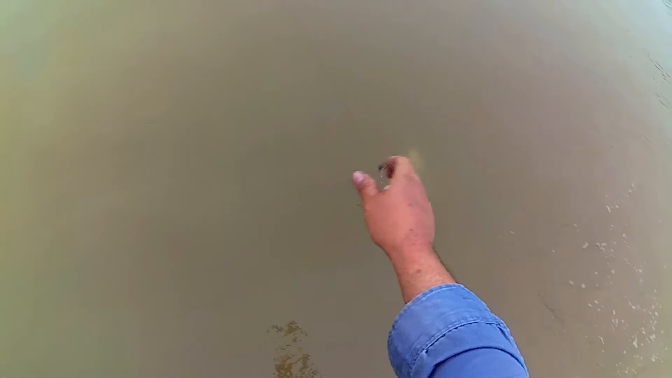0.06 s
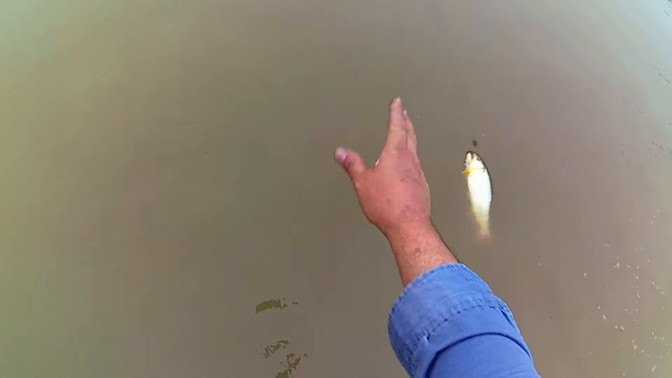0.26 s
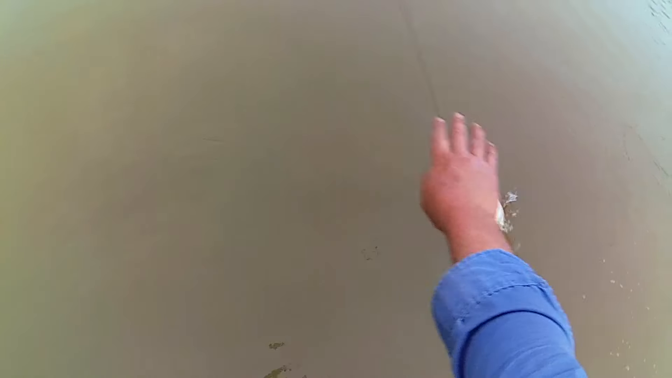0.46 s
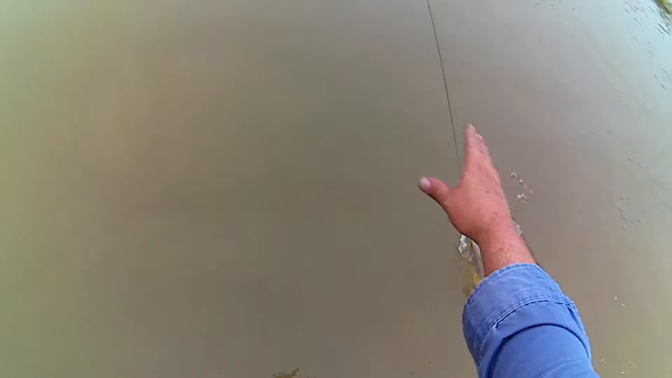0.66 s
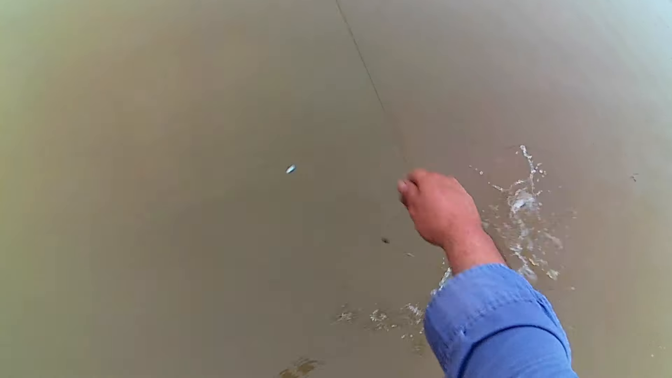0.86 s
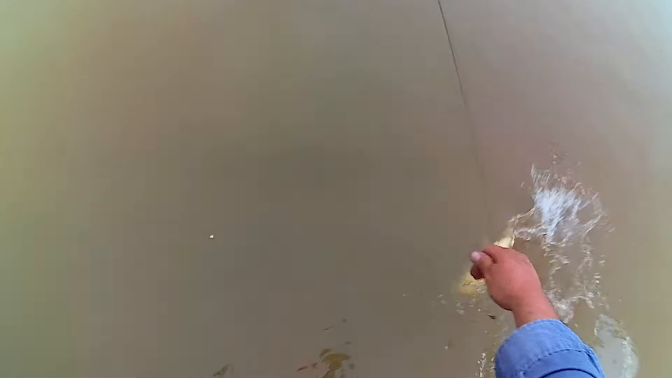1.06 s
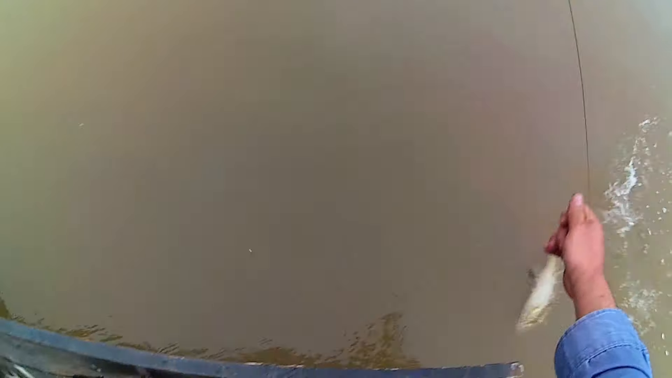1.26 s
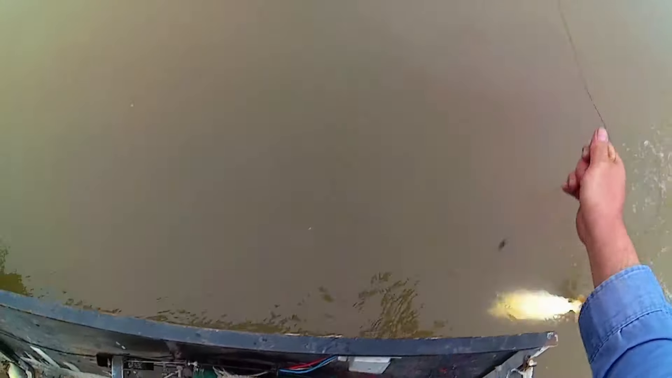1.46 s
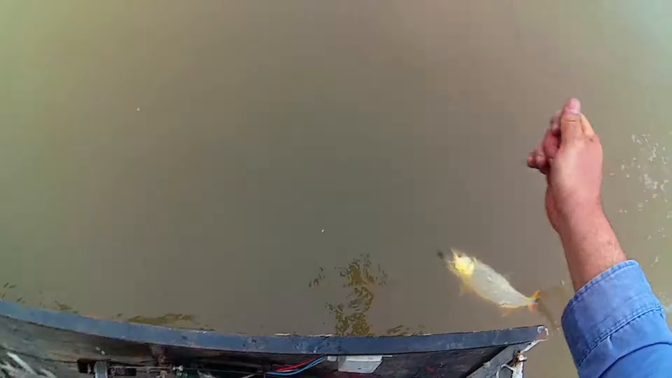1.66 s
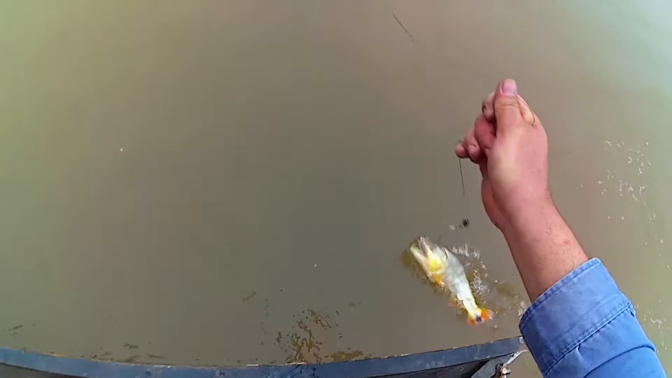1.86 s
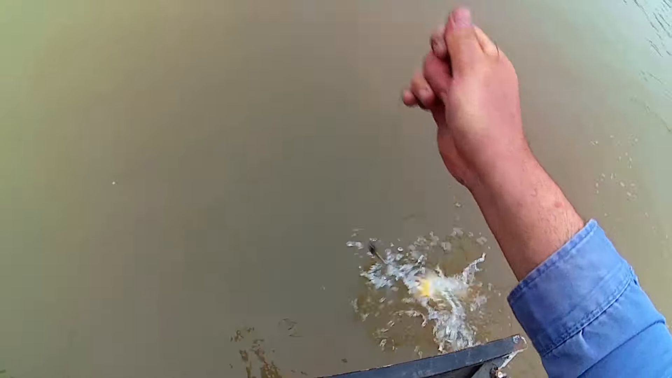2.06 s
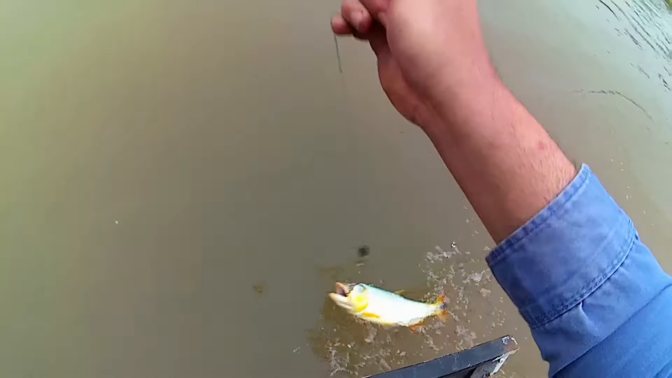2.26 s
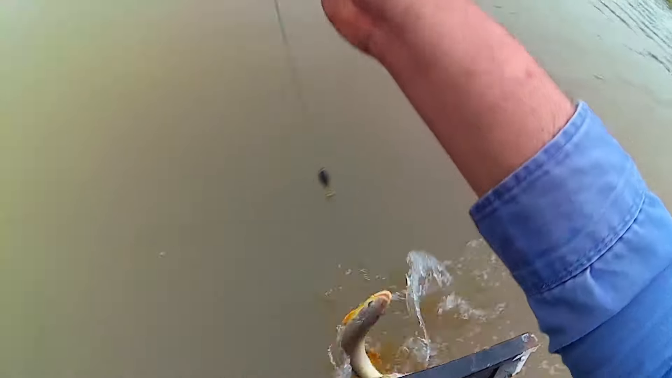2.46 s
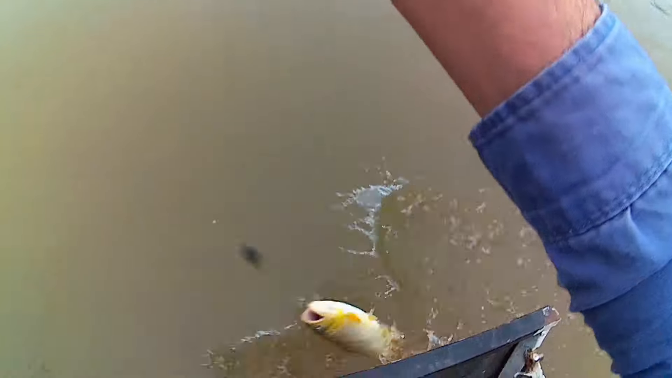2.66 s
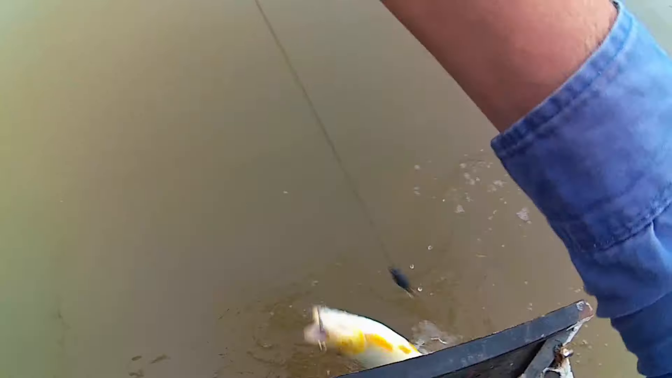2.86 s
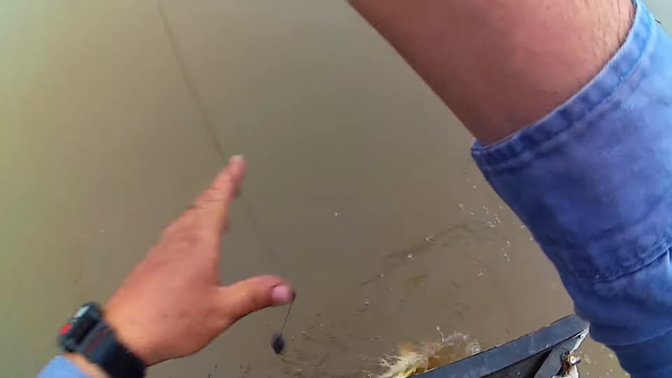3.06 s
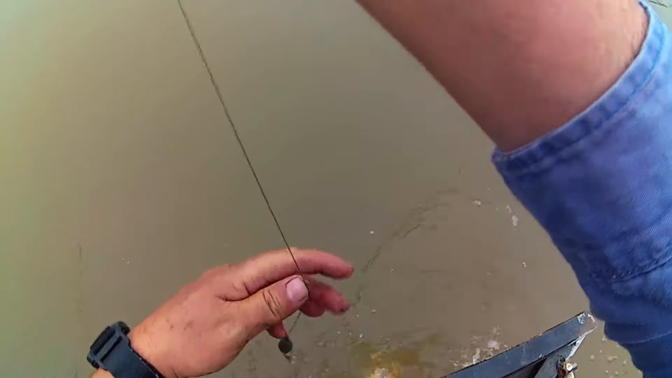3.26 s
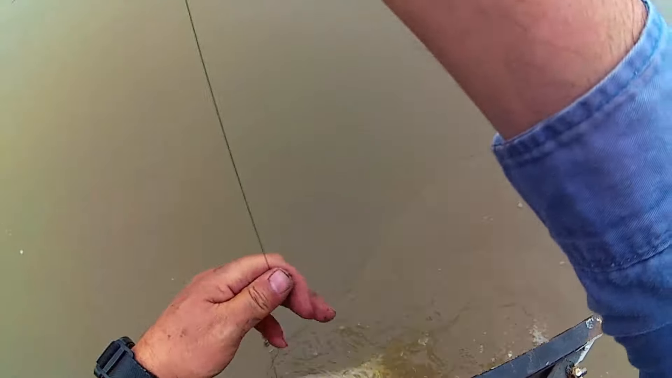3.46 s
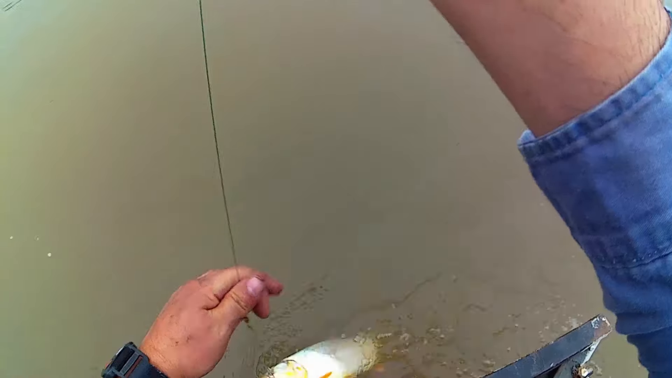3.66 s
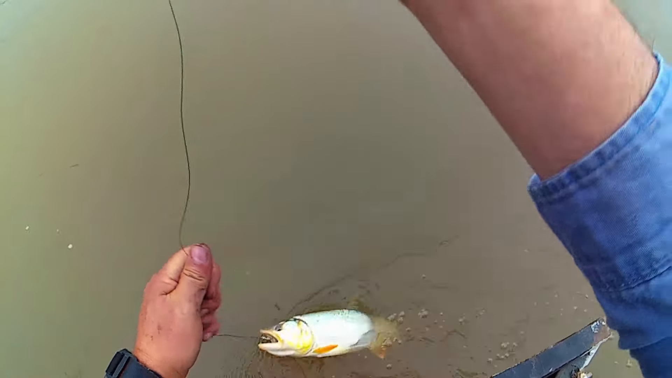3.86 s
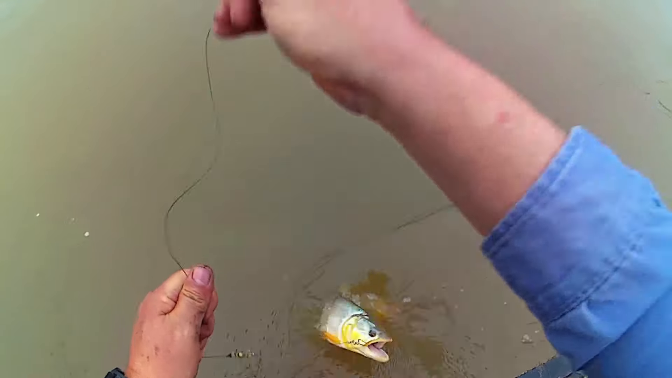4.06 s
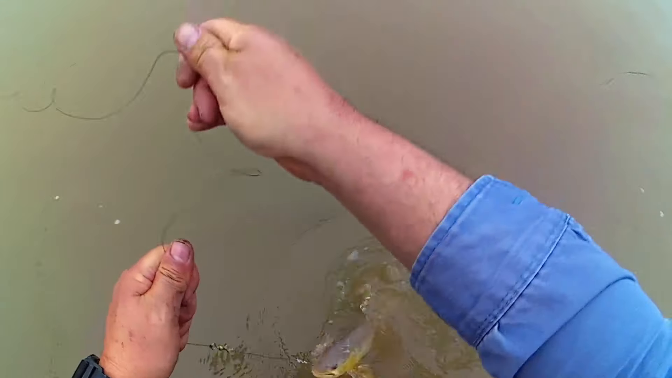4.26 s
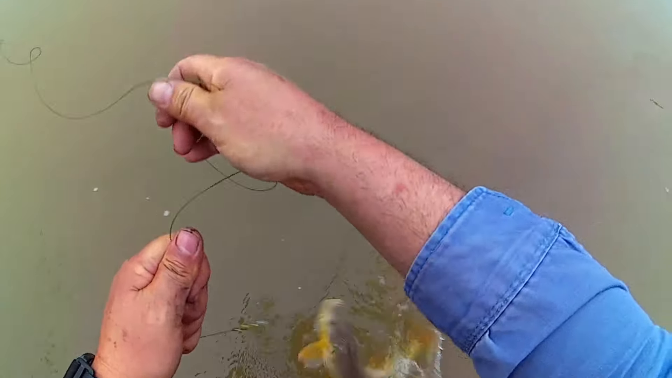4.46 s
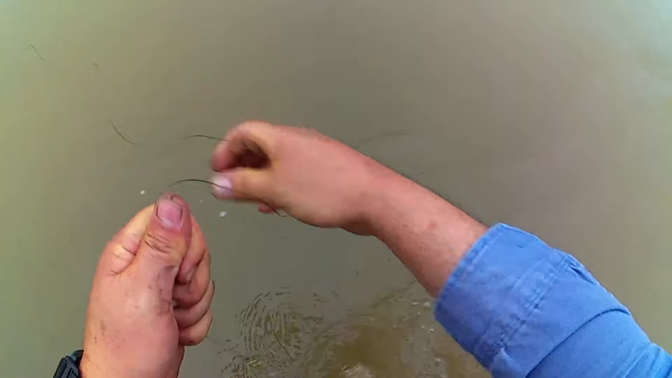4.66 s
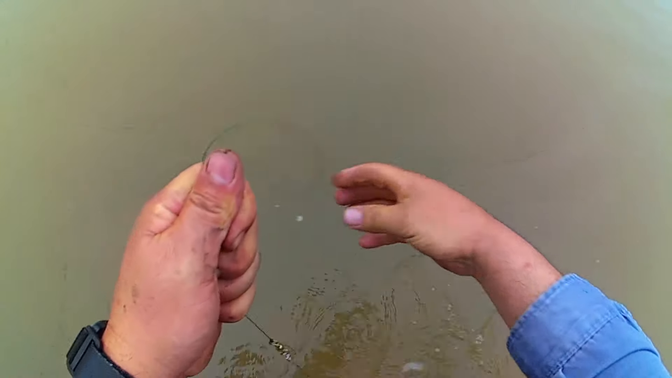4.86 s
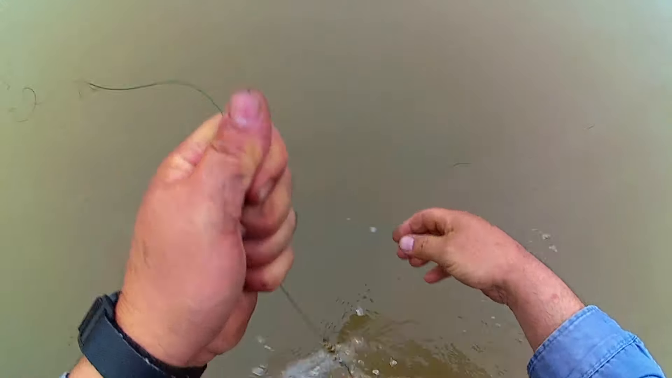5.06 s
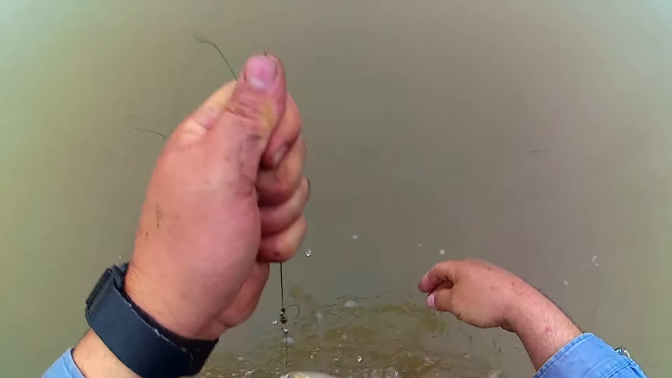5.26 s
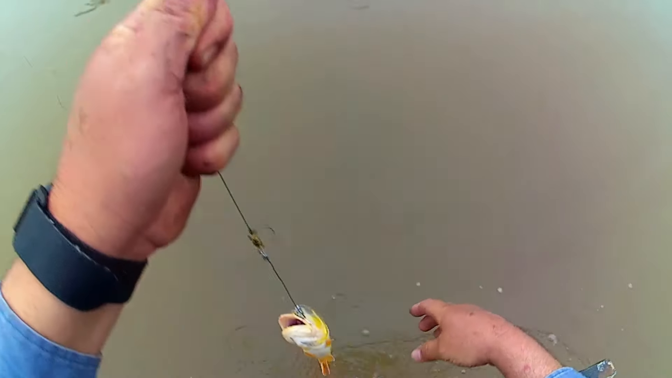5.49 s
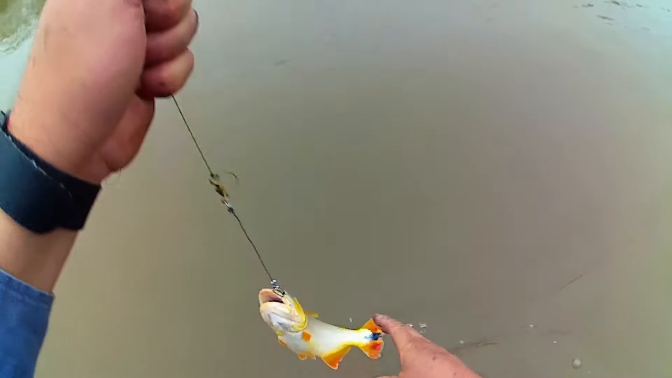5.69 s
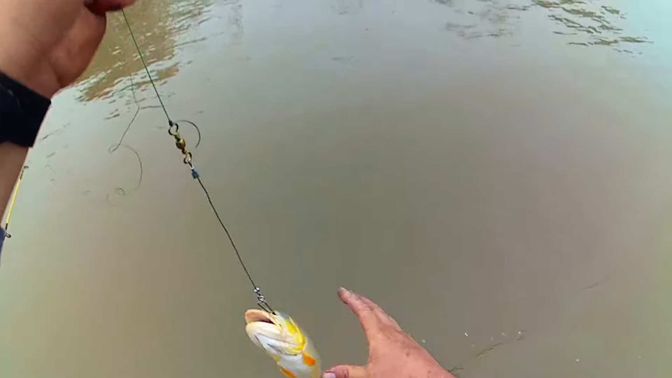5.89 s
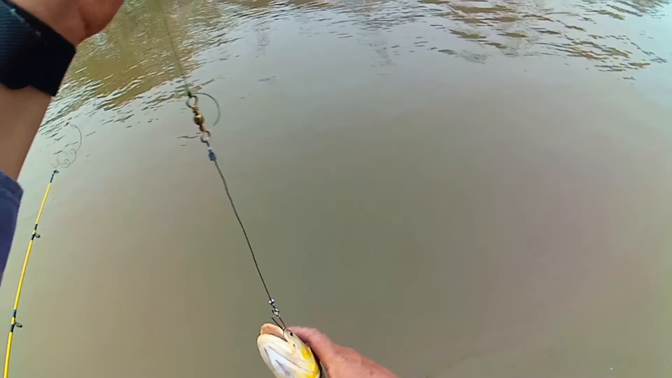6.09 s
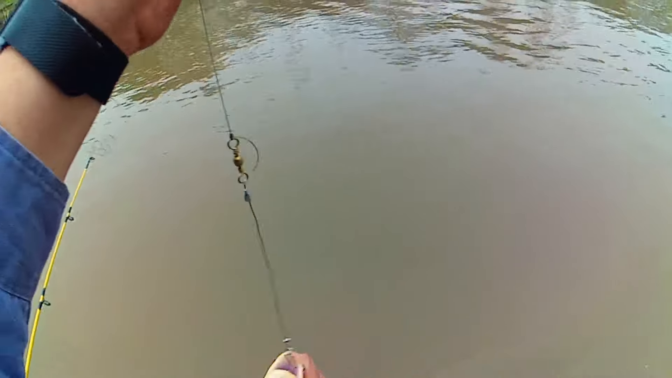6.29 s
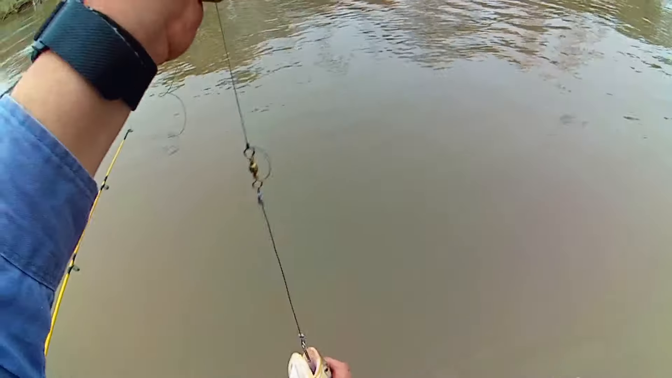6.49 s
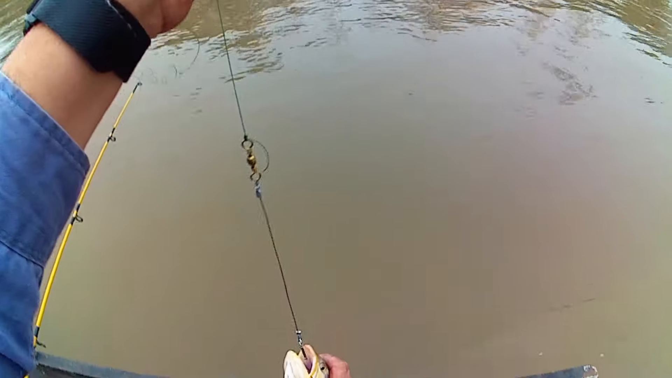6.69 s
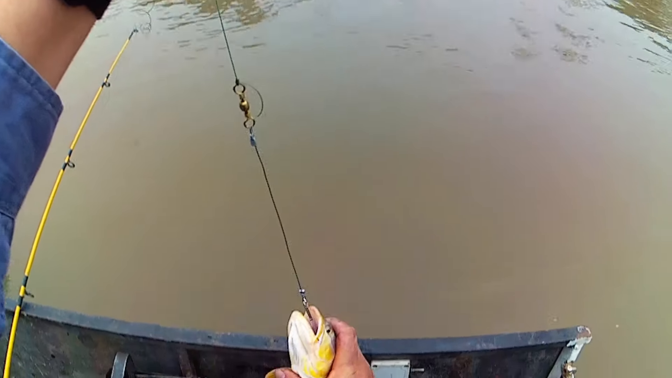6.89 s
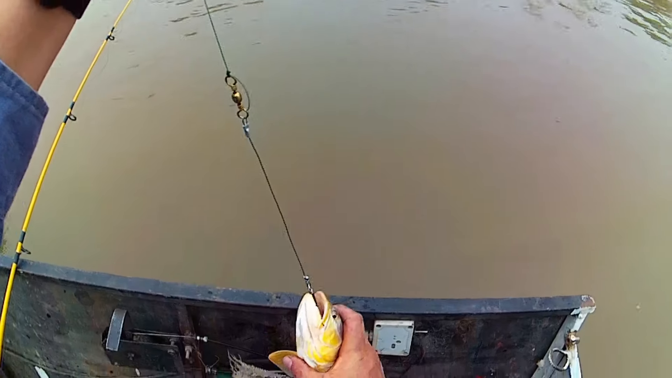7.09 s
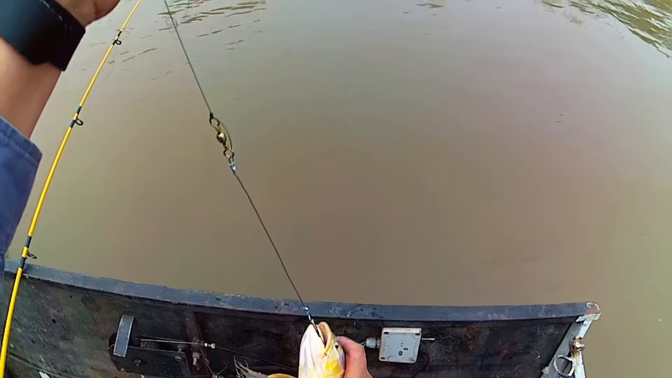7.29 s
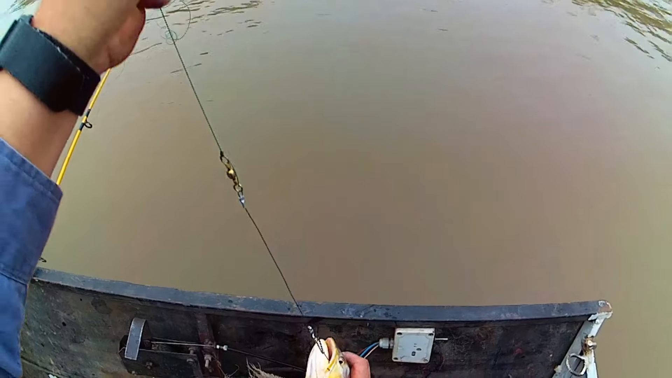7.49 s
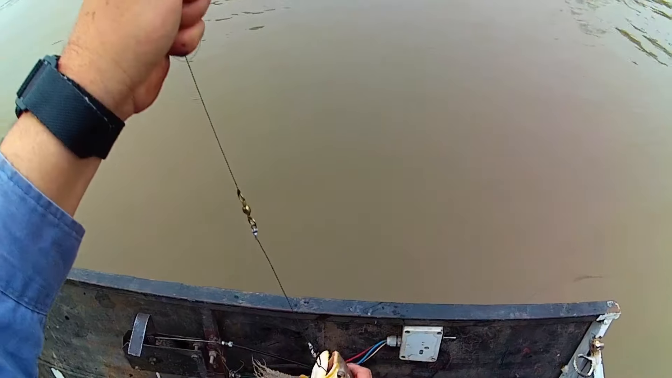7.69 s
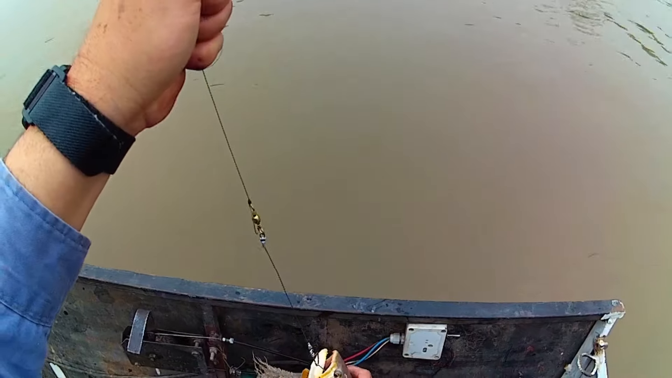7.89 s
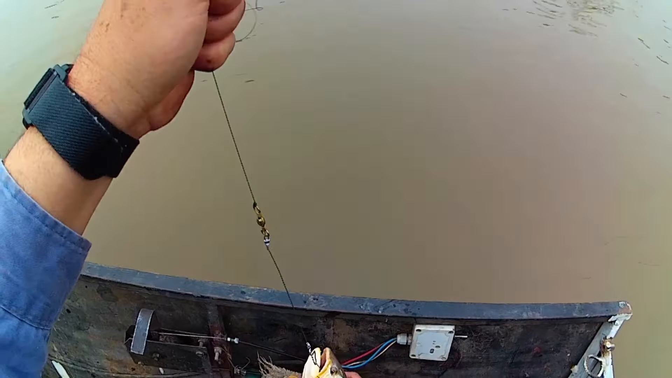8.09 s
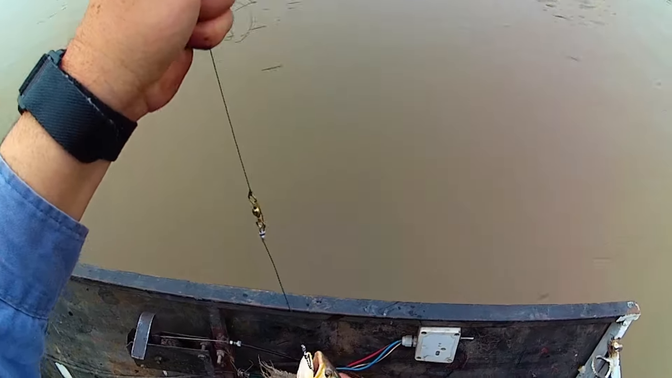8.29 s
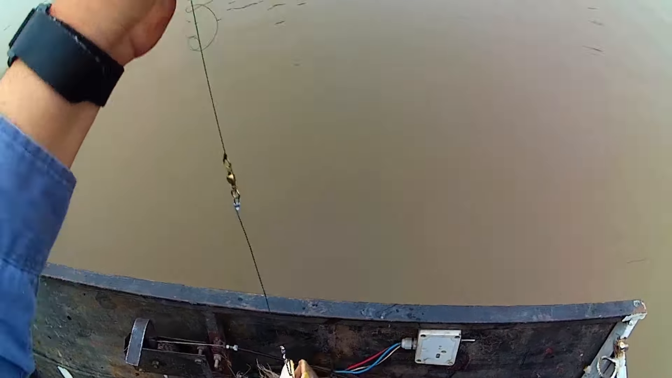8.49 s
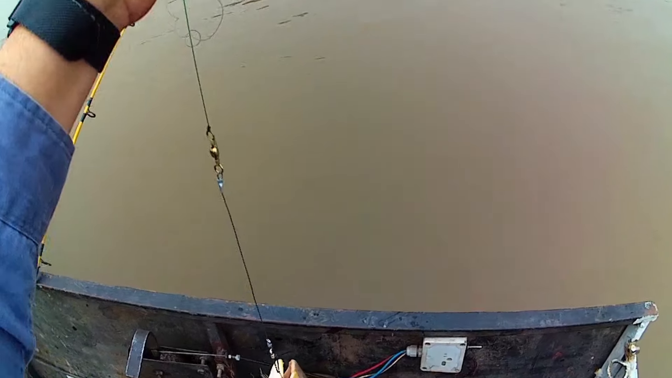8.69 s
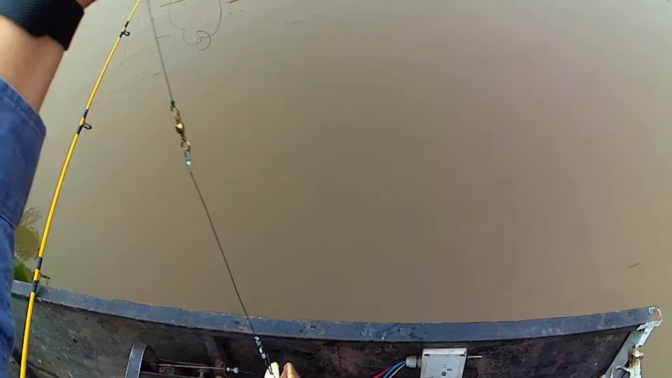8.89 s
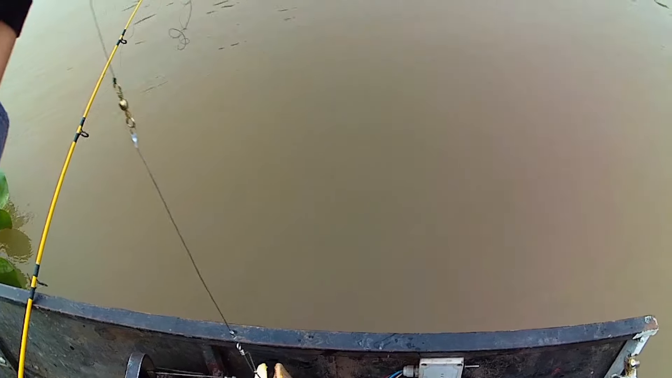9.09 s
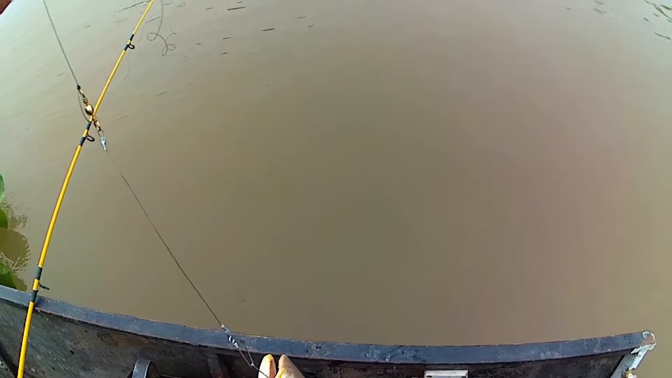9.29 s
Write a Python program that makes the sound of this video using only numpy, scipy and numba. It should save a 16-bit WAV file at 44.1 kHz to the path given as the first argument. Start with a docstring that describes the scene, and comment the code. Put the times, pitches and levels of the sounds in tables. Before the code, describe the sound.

Outdoors beside a small metal boat, with faint river wash, thin hiss and low wind buffets on a worn microphone. Splashes start sparse, grow into wet slaps and gurgling churn, and peak in two loud, booming hull blows with bright spray. Softer splashing returns, surges briefly near five seconds and dies away. As the fish is lifted out, soft thuds, low jolts and one bright metallic click close the scene quietly.

```python
"""River, light breeze and thin hiss at a body-worn camera beside a small metal boat: filtered noise throughout.
From the start a hooked fish thrashes: swarms of bubble sines over noise, single plops, noise-struck smacks.
Near 3 s it bangs the hull twice (boom, ringing modes, slap); the second bang throws a hissing sheet of water.
Weaker thrashing follows until about 6 s, with the first knock and jolt of the camera.
Then the fish is lifted out: knocks of dull noise, a few clacks of ringing tackle and further jolts remain."""
import sys
import numpy as np
from scipy import signal
from scipy.fft import rfft, irfft
from scipy.io import wavfile
from scipy.ndimage import uniform_filter1d
from numba import njit

SR = 44100
rng = np.random.default_rng(int(sys.argv[2]) if len(sys.argv) > 2 else 0)


def unload_audio(sound):
    """Save the sound as a 16-bit wav file, at the path given as the first command line argument."""
    columns = np.transpose(np.atleast_2d(sound))
    # keep every value between -1 and 1, then stretch to whole-number steps
    steps = np.round(np.clip(columns, -1, 1) * 32767)
    wavfile.write(sys.argv[1], SR, steps.astype(np.int16))


N = 411894

# breeze on the microphone, before buffets: (time [s], level in the lulls [dB])
GUSTS = [(0.0, -56.5), (0.52, -61.5), (0.83, -52), (2.03, -57.5), (2.18, -46.5), (3.0, -47.5), (3.6, -60),
         (4.81, -58.5), (4.94, -55.5), (5.96, -58.5), (6.11, -54), (6.45, -51.5), (6.97, -61.5),
         (8.48, -70), (8.66, -65), (9.34, -68)]
# wash of river and clothing: (time [s], level [dB])
WASH_LEVEL = [(0, -57.5), (.45, -67), (3.6, -57), (4.05, -70.5), (5.8, -68), (6.05, -60), (6.5, -59),
              (7.9, -70.5), (8.55, -68.5), (8.8, -63), (9.34, -61)]
# thin treble hiss: (time [s], level [dB])
HISS_LEVEL = [(0, -70.5), (.45, -74.5), (3.7, -70.5), (4.07, -74.5), (5.4, -69.5), (5.8, -74.5),
              (6.45, -71), (7.95, -78), (9.34, -77)]
# jolts of the worn camera: (time [s], envelope peak [dB], frequency [Hz])
JOLTS = [(3.954, -42, 62), (5.615, -31.5, 51), (6.129, -30.5, 36.3), (6.31, -32.5, 27), (6.837, -33, 76.5)]
# clacks of tackle: (time [s], peak [dB], brightness [dB/octave], low-pass [Hz])
CLACKS = [(6.4592, -23, 2, 7000), (6.485, -44, -3, 6000), (7.636, -41.5, -3, 3200), (8.41, -50, -1, 1600)]
# modes of the tackle: (frequency [Hz], relative level [dB], t60 [s])
TACKLE_MODES = [(417, 9, 0.12), (890, 4.5, 0.028), (1400, 17, 0.0086), (1845, 1.5, 0.015), (2510, 9, .01),
                (5000, -13, 0.0085)]
# bumps as the fish is handled: (time [s], level [dB], treble relative to thud [dB], t60 [s])
KNOCKS = [(3.742, -38.5, -41, 0.058), (5.872, -51, -17.5, 0.42), (5.988, -48.5, -32, 0.11),
          (6.064, -34, -37, 0.034), (6.345, -43.5, -19.5, 0.35), (6.452, -32, -35, 0.28),
          (6.643, -35.5, -41, 0.028), (6.746, -47, -18, 0.058), (6.825, -42, -21.5, 0.16),
          (7.064, -38.5, -41, 0.066), (7.084, -42.5, -25, 0.084), (7.117, -41, -29, 0.052),
          (7.161, -43, -38, 0.092), (7.221, -44.5, -23, 0.21), (7.289, -38.5, -28, 0.064),
          (7.559, -55.5, -22.5, 0.12), (7.637, -47.5, -23, 0.14), (7.764, -59.5, -23, 0.32),
          (7.804, -53.5, -14, 0.13), (8.41, -57.5, -23, 0.15)]
# fish against hull: (time [s], level [dB], boom frequency [Hz])
BANGS = [(3.042, -10, 460), (3.2143, -10.5, 285), (3.216, -9, 473)]
# modes of the hull: (frequency [Hz], relative level [dB], t60 [s])
HULL_MODES = [(120.1, -3, 0.85), (175.5, -8, 0.8), (237, -2, 0.72), (272.5, 2, 0.57), (299, 4.5, 0.58),
              (331, 3.5, .35), (358, -3.5, 0.28), (396, -5.5, 0.4), (450, 7, 0.3), (593, -6, 0.35),
              (823, -7.5, .3), (836, -4.5, 0.22), (1140, -11.5, 0.26), (1260, -13.5, 0.57)]
# smacks of tail and falling water: (time [s], peak [dB], centre [Hz], half the t60 of the push [s])
SMACKS = [(.957, -26, 1250, 0.013), (1.019, -28, 3500, 0.011), (1.0993, -11, 1200, 0.0031),
          (1.333, -18, 1300, 0.017), (2.025, -27, 1090, .008), (2.691, -24.5, 3300, 0.021),
          (2.752, -25.5, 2600, 0.0065), (2.807, -22.5, 1590, 0.003), (3.315, -26, 2660, .012),
          (3.349, -25.5, 1690, 0.0081), (3.582, -38, 3170, 0.011), (4.413, -38.5, 3840, 0.051),
          (4.453, -38, 1710, 0.0022), (4.744, -34, 1900, 0.0095), (4.877, -22, 1140, 0.072),
          (5.132, -30, 1410, 0.0069), (5.269, -33, 3150, 0.012), (5.624, -43, 3600, 0.017)]
# closing air pockets and single drops:
# (time [s], starting pitch [Hz], level before damping [dB], life [s], pitch rise before limiting [octaves])
PLOPS = [(.545, 570, -40.5, 0.041, 2.5), (0.737, 905, -26, 0.016, -0.5), (0.751, 747, -21.5, 0.017, 0),
         (0.9559, 947, -15, 0.018, .1), (1.176, 291, -26, 0.035, 1.7), (1.262, 2300, -36, 0.0096, -4),
         (1.275, 312, -34, 0.077, 0.8), (1.302, 1025, -24, 0.011, .5), (1.325, 524, -10, 0.019, 0.6),
         (1.332, 785, -20, 0.022, .2), (1.912, 735, -37, 0.025, -0.3), (1.962, 844, -23, 0.025, 0.5),
         (1.967, 335, -27, 0.093, -0.5), (2.024, 780, -23, 0.02, .7), (2.144, 995, -20.5, 0.026, 1.2),
         (2.182, 3640, -32.5, 0.007, 1), (2.188, 408, -23.5, 0.022, 1), (2.407, 2050, -39, 0.011, .6),
         (2.422, 2290, -32.5, 0.0091, 2.3), (2.519, 754, -24, 0.058, 0.3), (2.655, 783, -18, 0.061, -0.3),
         (2.752, 1050, -16, 0.0049, 1.2), (2.7679, 647, -15, 0.0095, 2.5), (3.347, 1140, -22.5, 0.012, .7),
         (3.394, 3280, -28.5, 0.017, 1.1), (3.573, 4640, -38.5, 0.0048, 1.7),
         (3.609, 567, -33.5, 0.054, -0.1), (3.649, 960, -29.5, 0.023, 0.4), (4.1756, 977, -31, 0.028, .6),
         (4.198, 630, -33.5, 0.012, 0), (4.292, 305, -30, 0.0072, -1.2), (4.452, 313, -24, 0.01, 0),
         (4.478, 496, -31, 0.041, 0.5), (4.501, 674, -24.5, 0.0046, 1), (4.658, 1055, -38, 0.0264, 2),
         (4.774, 242, -17.5, 0.005, 1), (4.809, 906, -25.5, 0.024, 2), (4.824, 475, -21, 0.016, 0),
         (4.844, 810, -19, 0.013, .2), (4.861, 469, -14, 0.027, 0.5), (4.92, 3650, -36, .01, 2.5),
         (4.989, 262, -32, .112, 2.3), (5.122, 970, -30.5, 0.024, 0.4), (5.266, 657, -26.5, 0.017, -0.5),
         (5.296, 532, -33.5, 0.054, 0.1), (5.401, 1120, -34, 0.021, 1)]
# strokes through the surface: (time [s], length [s], bubbling [dB], deep churning [dB], spray [dB])
STROKES = [(.01, 0.022, -61, -89, -65), (0.535, 0.051, -50, -59, -65), (0.579, 0.095, -42, -54.5, -56),
           (0.718, 0.23, -40.5, -63, -53.5), (0.906, 0.093, -38, -64, -49.5),
           (1.087, 0.068, -38, -61, -48.5), (1.166, 0.11, -38.5, -51, -47.5), (1.308, 0.039, -32, -67, -42),
           (1.467, 0.056, -42, -52, -52), (1.636, 0.0083, -49, -55.5, -83), (1.722, 0.019, -49, -47, -64),
           (1.796, 0.17, -59.5, -65.5, -73.5), (1.952, 0.11, -39, -36.5, -48.5),
           (2.063, 0.048, -35.5, -46, -43), (2.141, 0.074, -36, -41, -52.5),
           (2.25, 0.13, -39.5, -55, -47.5), (2.365, 0.35, -42, -37.5, -54.5),
           (2.634, 0.18, -38.5, -42, -44.5), (2.895, 0.022, -35.5, -41, -45), (3.051, 0.054, -41, -32, -57),
           (3.236, 0.11, -41, -39.5, -48), (3.565, 0.076, -49.5, -55, -63),
           (4.155, 0.045, -50.5, -67.5, -56.5), (4.3, 0.097, -53.5, -52, -65.5),
           (4.407, 0.091, -46, -50.5, -61), (4.646, 0.061, -61, -79, -57.5),
           (4.735, 0.15, -42, -46.5, -53.5), (4.833, 0.041, -32.5, -34.5, -42),
           (4.92, 0.012, -62, -39, -57), (5.03, 0.19, -49, -62.5, -59), (5.237, 0.12, -44.5, -58, -51.5),
           (5.388, 0.12, -59, -56.5, -64), (5.566, 0.11, -72, -65.5, -72)]
# rows bubbling, churning, spray: (attack [s], release t60 [s], settling share [dB], settling t60 [s])
STROKE_RESPONSE = [(0.009, 0.22, -11.5, 0.96), (0.023, 0.27, -15.5, 1.0), (0.024, 0.33, -10.5, 1)]

# spectra: (frequency [Hz], relative density [dB per Hz])
BREEZE_SPECTRUM = [(12, 3.5), (30, -6.5), (70, -1.5), (110, -7.5), (180, -25), (400, -48), (900, -55.5)]
RIVER_SPECTRUM = [(100, -5.5), (250, -2), (450, -4.5), (800, -10), (1400, -12), (2000, -22), (4800, -28),
                  (7000, -31.5), (12000, -42.5)]
HISS_SPECTRUM = [(1300, -15.5), (2000, -10), (2700, -4.5), (5000, -9), (7900, -5.5), (8400, 3),
                 (9000, -5.5), (12300, -4.5), (13600, -2), (15500, -3.5)]
KNOCK_SPECTRUM = [(60, -13), (190, 7), (420, 1.5), (700, -2.5), (1300, -14), (2400, -33), (12000, -55.5)]
SHEET_SPECTRUM = [(500, -11.5), (1200, 12), (2700, -1.5), (3200, -6.5), (3900, 2.5), (6200, -6.5),
                  (8000, -1.5), (10500, -3), (15000, -16)]
CHURNING_SPECTRUM = [(70, -31), (130, -1.5), (250, -3.5), (420, -4), (560, 1), (900, -24.5), (4000, -72)]
BUBBLING_SPECTRUM = [(230, -33), (420, -5), (600, 0), (850, 2.5), (1250, -3), (1650, -9.5), (2400, -36),
                     (6000, -42.5)]
SPRAY_SPECTRUM = [(1000, -28.5), (1700, -12), (2220, -10), (2700, -5.5), (3220, -19), (3800, -7),
                  (4370, -15), (5500, -14.5), (6320, -21), (7960, -15.5), (9580, -14.5), (10800, -25.5),
                  (12300, -29), (14100, -26), (15500, -32)]

BUFFET_DB, BUFFET_SPREAD_DB, BUFFETS_PER_S = 7.5, 3, 11  # mean height above the lulls, spread, rate
DRUMMING_DB, DRUMMING_T60_S, DRUMMING_TOP_HZ = -22, 0.68, 483  # small hull panels rumbling on
SHEET_START_S, SHEET_ATTACK_S, SHEET_HOLD_S, SHEET_T60_S, SHEET_DB = 3.199, 0.0032, 0.024, 0.079, -27.5
DRAIN_DB, DRAIN_T60_S = -24.5, 0.53  # level relative to the sheet
DAMPING_HZ = 399  # a pocket of this pitch loses one neper over its life, higher ones more
CLIMB_HZ = 700  # limit on a pocket's pitch rise: it bursts first
RUSH_DB, MIST_DB = -9, -3  # torn water relative to the bubbles, fine mist relative to the drops
IN_WATER_S = 6.0
TOP_HZ = 15750


def undb(db):
    """Decibels to gain."""
    return 10 ** (np.asarray(db) / 20)


def unit(x):
    """Scale to rms 1."""
    return x / np.sqrt(np.mean(x ** 2))


def curve(table):
    """Rows of (time [s], value) joined by straight lines."""
    return np.interp(np.arange(N) / SR, *np.transpose(table))


def add(out, start_s, x):
    """Mix x into out at start_s."""
    i = max(int(start_s * SR), 0)
    out[i:i + len(x)] += x[:max(N - i, 0)]


def colour(x, points, size=4096):
    """Minimum-phase filter with the given (Hz, dB) response, built from its folded cepstrum."""
    hz, db = np.transpose(points)
    f = np.maximum(np.fft.rfftfreq(size, 1 / SR), 1)
    response_db = np.interp(np.log(f), np.log(hz), db)
    cepstrum = irfft(np.log(undb(response_db)))
    cepstrum[1:size // 2] *= 2
    cepstrum[size // 2 + 1:] = 0
    impulse = irfft(np.exp(rfft(cepstrum)))
    return signal.fftconvolve(x, impulse)[:len(x)]


def noise(points, count=N):
    """Noise of rms 1 with the given (Hz, dB) spectrum."""
    return unit(colour(rng.standard_normal(count), points))


def walk(rate_hz):
    """Smoothed random steps, rate_hz per second, rms near 1."""
    k = int(SR / rate_hz)
    steps = np.repeat(rng.standard_normal(N // k + 1), k)
    return unit(uniform_filter1d(steps, k)[:N])


def fade(t, t60_s):
    """Decay that falls 60 dB in t60_s."""
    return np.exp(-np.log(1000) * t / t60_s)


def band(x, hz, width):
    """One resonance, its width a share of its centre."""
    return signal.lfilter(*signal.iirpeak(hz, 1 / width, fs=SR), x)


def lowpass(x, top_hz, order=4):
    """Butterworth low-pass."""
    return signal.sosfilt(signal.butter(order, top_hz, fs=SR, output="sos"), x)


def modes(t, hz, gain_db, t60_s, phase=0):
    """One decaying resonant mode."""
    return undb(gain_db) * fade(t, t60_s) * np.sin(2 * np.pi * hz * t + phase)


def breeze():
    """Wind pressure on the microphone: low noise in random buffets."""
    buffets_db = BUFFET_DB + BUFFET_SPREAD_DB * walk(BUFFETS_PER_S)
    return noise(BREEZE_SPECTRUM) * undb(curve(GUSTS) + buffets_db)


def wash_and_hiss():
    """River and clothing wash plus thin hiss: noises whose levels ripple together."""
    ripple_db = 1.8 * walk(22)
    wash = noise(RIVER_SPECTRUM) * undb(curve(WASH_LEVEL) + ripple_db)
    hiss = noise(HISS_SPECTRUM) * undb(curve(HISS_LEVEL) + ripple_db / 2)
    return wash + hiss


def jolts():
    """Body movement jolts the camera: a slow, quickly dying swing of pressure at the microphone."""
    out, t = np.zeros(N), np.arange(SR // 4) / SR
    for start_s, db, hz in JOLTS:
        cycles = hz * t
        envelope = 2 * cycles * np.exp(1 - 2 * cycles)
        add(out, start_s, undb(db) * np.sin(2 * np.pi * cycles) * envelope)
    return out


def clacks():
    """A hard, slightly rattling contact excites the tackle's modes; each clack has its own brightness."""
    out, t = np.zeros(N), np.arange(SR // 5) / SR
    lowest_hz = TACKLE_MODES[0][0]
    for start_s, db, tilt, top_hz in CLACKS:
        ring = sum(modes(t, hz, gain + tilt * np.log2(hz / lowest_hz), t60_s)
                   for hz, gain, t60_s in TACKLE_MODES)
        contact = .2 * rng.standard_normal(len(t)) * fade(t, 0.0057)
        contact[0] += 1
        x = lowpass(signal.fftconvolve(contact, ring)[:len(t)], min(top_hz, SR / 3))
        add(out, start_s, undb(db) * x / np.abs(x).max())
    return out


def hull(t):
    """The hull's modes; every blow lands elsewhere and weights them anew."""
    chance = rng.standard_normal((len(HULL_MODES), 2))
    ring = sum(modes(t, hz, db + shift_db, t60_s, phase / 2)
               for (hz, db, t60_s), (shift_db, phase) in zip(HULL_MODES, chance))
    return ring * (1 - fade(t, 0.04)) / np.sqrt(len(HULL_MODES))


def knocks():
    """Bumps in the boat: a dull noise thud with a little scuff, carried faintly by the hull."""
    out, t = np.zeros(N), np.arange(SR // 2) / SR
    for start_s, db, treble_db, t60_s in KNOCKS:
        thud = noise(KNOCK_SPECTRUM, len(t))
        scuff = undb(treble_db) * noise(SPRAY_SPECTRUM, len(t))
        bump = (thud + scuff) * fade(t, t60_s) + undb(-21.0) * hull(t)
        add(out, start_s, undb(db) * (1 - fade(t, 0.0055)) * bump)
    return out


def bangs():
    """The soft body strikes with a short boom and a wet slap; the hull rings and rumbles on."""
    out, t = np.zeros(N), np.arange(SR) / SR
    yielding = 1 - fade(t, 0.005)  # flesh gives way, so the noise takes a moment to build
    for start_s, db, hz in BANGS:
        boom = np.sin(2 * np.pi * hz * t) * fade(t, 0.032) * (1 - fade(t, 0.013))
        rattle = noise(KNOCK_SPECTRUM, SR) * fade(t, 0.15)
        slap = noise(SHEET_SPECTRUM, SR) * fade(t, 0.056)
        rumble = colour(rng.standard_normal(SR), CHURNING_SPECTRUM)
        rumble = unit(lowpass(rumble, DRUMMING_TOP_HZ, order=6))
        drumming = undb(DRUMMING_DB) * rumble * fade(t, DRUMMING_T60_S)
        noisy = yielding * (drumming + undb(-11) * rattle + undb(-20.5) * slap)
        add(out, start_s, undb(db) * (undb(6.5) * boom + undb(-7.5) * hull(t) + noisy))
    return out


def sheet():
    """A sheet of water hits the hull with a short, bright hiss and drains away."""
    envelope, t = np.zeros(N), np.arange(SR) / SR
    after = np.maximum(t - SHEET_HOLD_S, 0)
    draining = undb(DRAIN_DB) * fade(after, DRAIN_T60_S)
    decay = np.maximum(fade(after, SHEET_T60_S), draining)
    add(envelope, SHEET_START_S, np.minimum(t / SHEET_ATTACK_S, 1) * decay)
    return envelope * noise(SHEET_SPECTRUM) * undb(SHEET_DB + 1.5 * walk(200))


def smacks():
    """Flat blows on the water: a rounded pressure spike and a short crackle."""
    out, t = np.zeros(N), np.arange(SR // 10) / SR
    for start_s, db, hz, ring_s in SMACKS:
        push = rng.standard_normal(len(t)) * fade(t, 2 * ring_s)
        push[0] += 5
        x = band(band(push, hz, 0.8), hz, 1.3)
        x = lowpass(x, min(1.59 * hz, SR / 3))
        add(out, start_s, undb(db) * x / np.abs(x).max())
    return out


@njit
def bubbles(start_s, hz, size, life_s, rise_oct, damping_np):
    """Each bubble is a fading sine whose pitch shifts ever faster as it nears the surface."""
    out = np.zeros(N)
    for k in range(len(start_s)):
        first, n, phase = int(start_s[k] * SR), int(life_s[k] * SR) + 2, 0.
        for i in range(min(n, N - first)):
            u = i / n  # share of life spent
            pitch_hz = min(hz[k] * 2 ** (rise_oct[k] * u * u), .45 * SR)
            phase += 2 * np.pi * pitch_hz / SR
            envelope = min(phase / 2, 1.) * np.exp(-damping_np[k] * u) * (1 - u ** 3)
            out[first + i] += size[k] * envelope * np.sin(phase)
    return out


def plops():
    """Large air pockets and single drops: bubbles of set pitch, the higher ones damped faster."""
    start_s, hz, db, life_s, rise_oct = np.array(PLOPS).T.copy()
    rise_oct = np.minimum(rise_oct, np.log2(1 + CLIMB_HZ / hz))
    damping_np = np.minimum(hz / DAMPING_HZ, 1.9)
    return bubbles(start_s, hz, undb(db), life_s, rise_oct, damping_np)


def swarm(low_hz, high_hz, cycles, spread_db, rise_oct, count):
    """Bubbles of random size, born at random moments while the fish is in the water."""
    when, pitch, loud, ring, lift = rng.random((count, 5)).T
    begin_s = STROKES[0][0]
    start_s = begin_s + (IN_WATER_S - begin_s) * (np.arange(count) + when) / count
    hz = low_hz * (high_hz / low_hz) ** pitch
    size = undb(spread_db * loud ** 2) * hz / low_hz
    life_s = cycles * 2 ** (2 * ring - 1) / hz
    return bubbles(start_s, hz, size, life_s, rise_oct * lift ** 2, np.full(count, 1.8))


def stirring(level_db, attack_s, release_t60_s, settle_db, settle_t60_s):
    """Each stroke swells, holds, dies quickly and leaves the water settling; strokes add in power."""
    power, t = np.zeros(N), np.arange(3 * SR // 2) / SR
    for (start_s, length_s, *_), db in zip(STROKES, level_db):
        after = np.maximum(t - length_s, 0)
        settling = undb(settle_db) * fade(after, settle_t60_s)
        release = fade(after, release_t60_s) ** 2 + settling ** 2
        add(power, start_s, (undb(db) * np.minimum(t / attack_s, 1)) ** 2 * release)
    return np.sqrt(power)


def thrashing():
    """Strokes stir deep churning, a bubble cloud and spray; torn water rushes under cloud and spray."""
    churn = swarm(161, 501, cycles=6, spread_db=5.5, rise_oct=0.19, count=1000)
    cloud = swarm(380, 2370, cycles=16, spread_db=13.5, rise_oct=.7, count=2500)
    ticks = swarm(1700, 8150, cycles=8.5, spread_db=24.5, rise_oct=0.3, count=9500)
    chirps = swarm(1500, 6000, cycles=44, spread_db=22, rise_oct=0.55, count=1800)
    churn = unit(colour(churn, CHURNING_SPECTRUM))
    cloud = unit(colour(cloud, BUBBLING_SPECTRUM))
    ticks = unit(colour(ticks, SPRAY_SPECTRUM))
    chirps = unit(colour(chirps, SPRAY_SPECTRUM))
    tearing = undb(2 * walk(110) + 2.6 * walk(32))  # quick, uneven spurts
    cloud = cloud + undb(RUSH_DB) * tearing * noise(BUBBLING_SPECTRUM)
    spray = (ticks + chirps / 2 + undb(MIST_DB) * noise(SPRAY_SPECTRUM)) * tearing
    levels_db = np.array(STROKES).T[2:]
    layers = zip((cloud, churn, spray), levels_db, STROKE_RESPONSE)
    return sum(unit(layer) * stirring(db, *response) for layer, db, response in layers)


def echo(water):
    """The boat's side and the water surface scatter a short tail back."""
    t = np.arange(SR // 4) / SR
    scatter = rng.standard_normal(len(t)) * fade(t, 0.024) * (1 - fade(t, 0.05))
    return signal.fftconvolve(water, scatter / np.linalg.norm(scatter))[:N]


def scene():
    """Air, camera jolts, boat, and the splashing with its echo."""
    background = breeze() + wash_and_hiss() + jolts()
    boat = clacks() + knocks() + bangs() + sheet()
    water = smacks() + plops() + thrashing()
    return (background + boat + water + undb(-13.5) * echo(water))[None]


def record(dry):
    """The camera cuts the top: steep elliptic low-pass."""
    return signal.sosfilt(signal.ellip(10, .2, 70, TOP_HZ, fs=SR, output="sos"), dry)


dry = scene()
out = record(dry)
unload_audio(out)
```